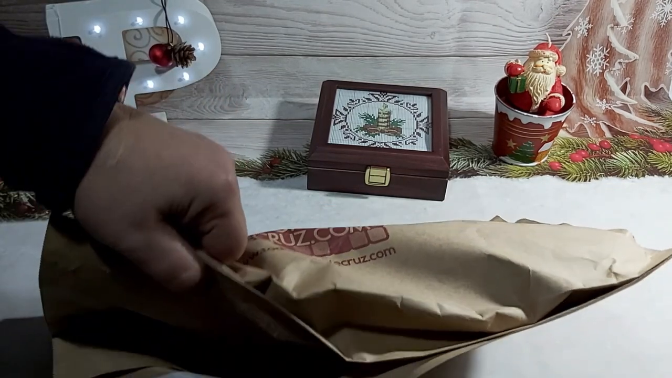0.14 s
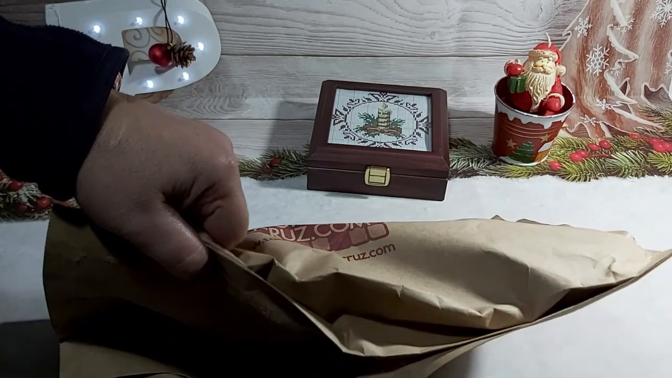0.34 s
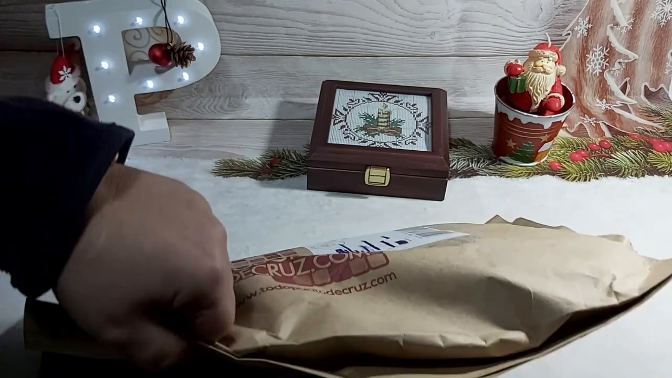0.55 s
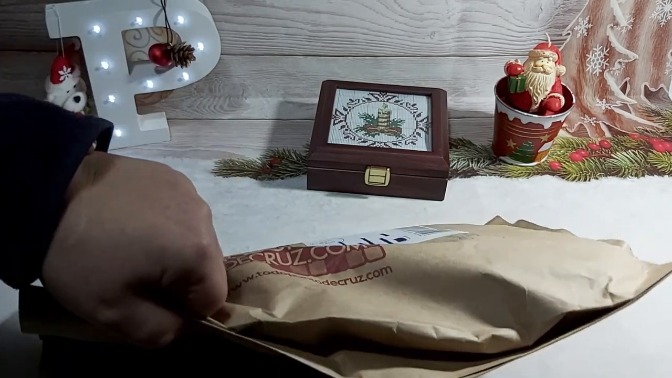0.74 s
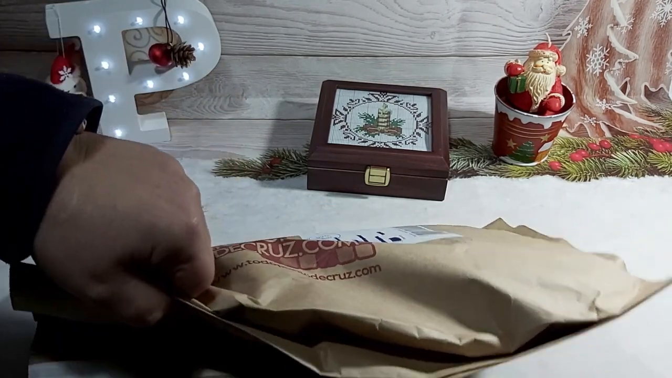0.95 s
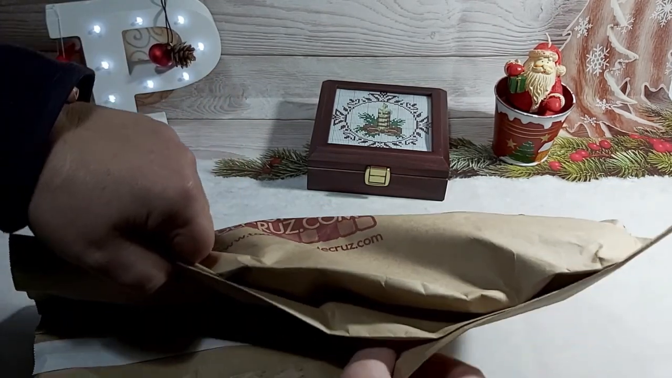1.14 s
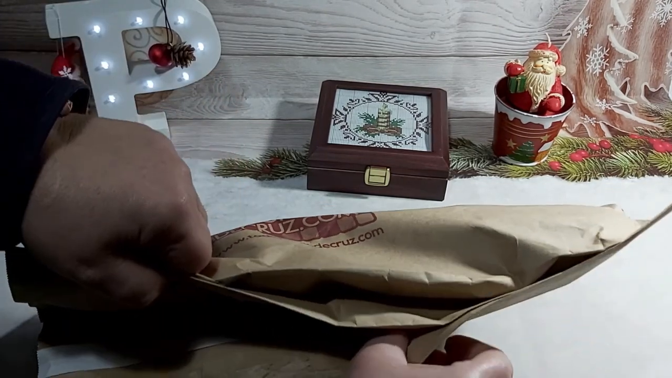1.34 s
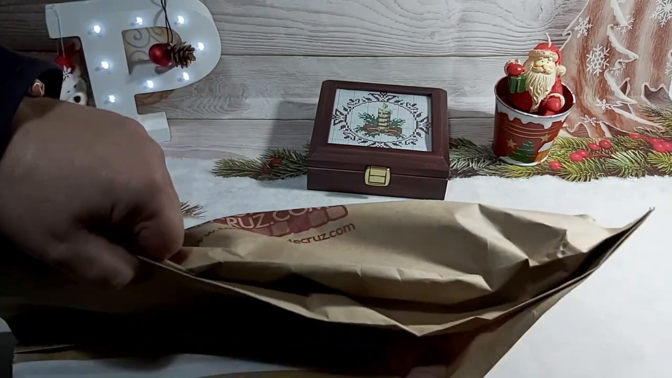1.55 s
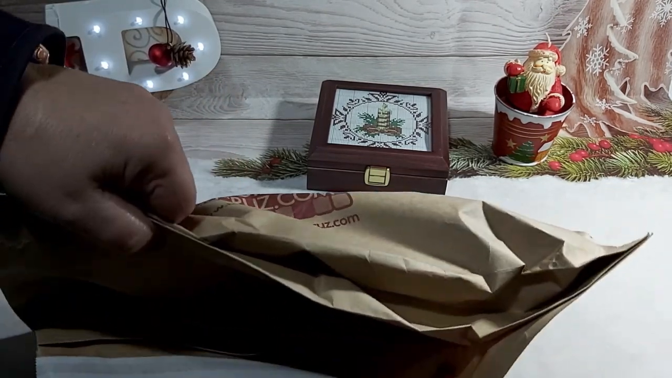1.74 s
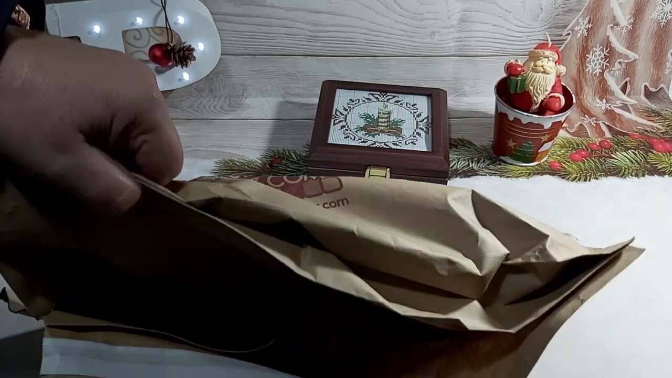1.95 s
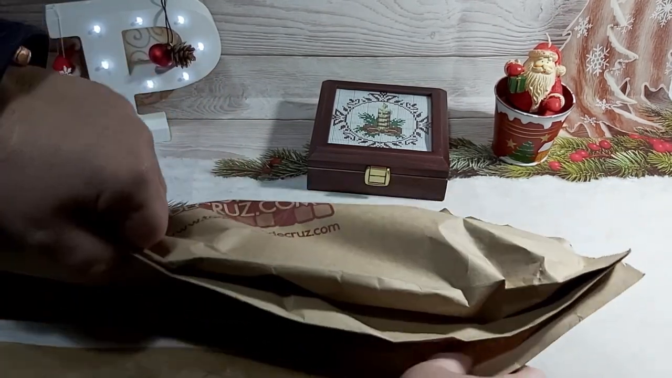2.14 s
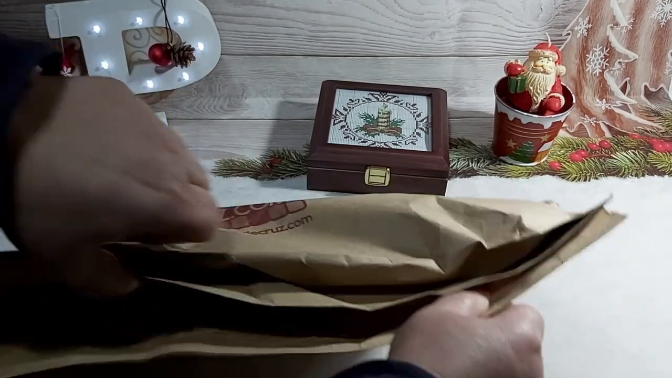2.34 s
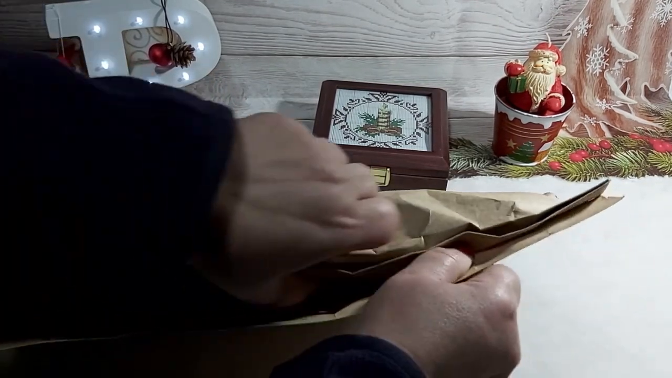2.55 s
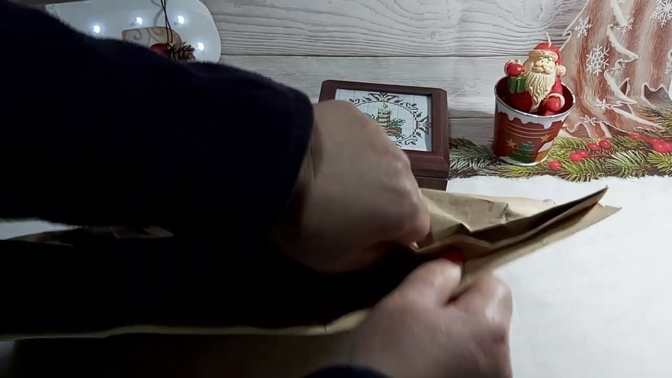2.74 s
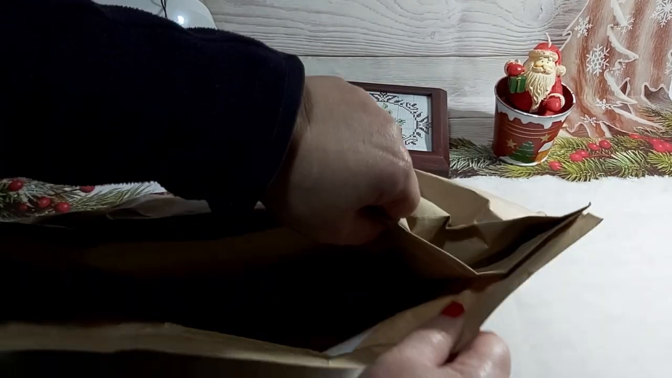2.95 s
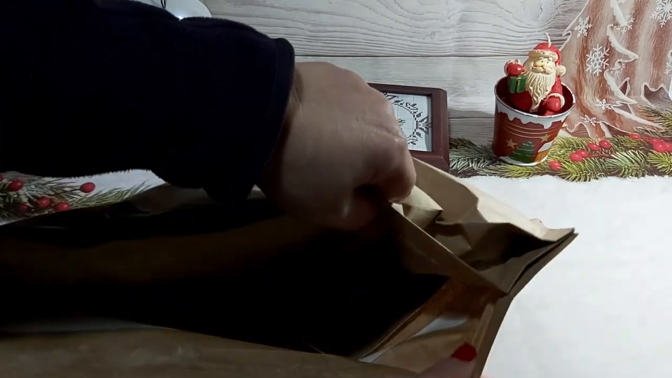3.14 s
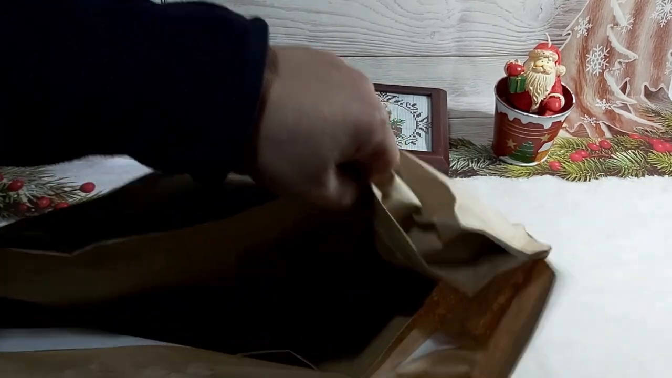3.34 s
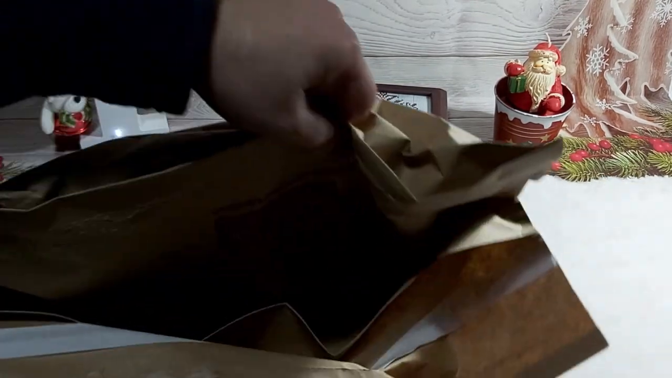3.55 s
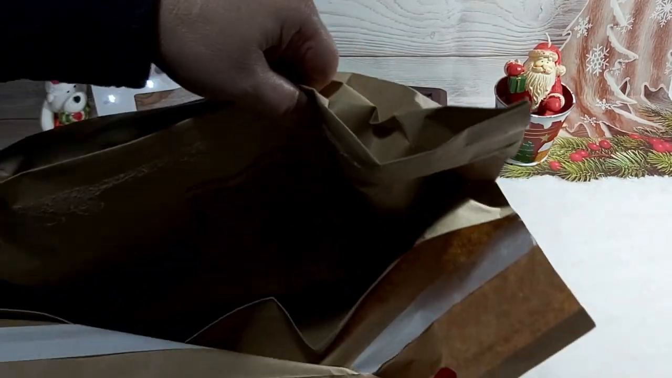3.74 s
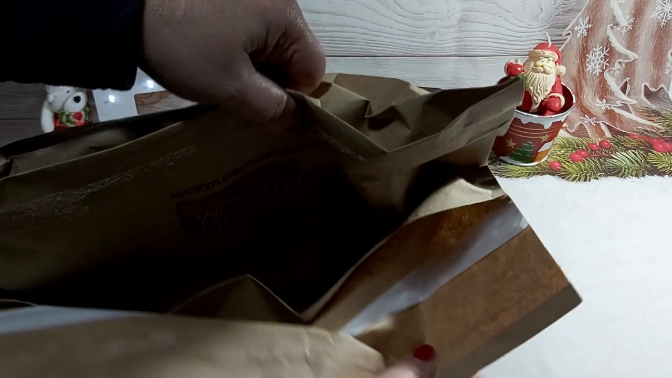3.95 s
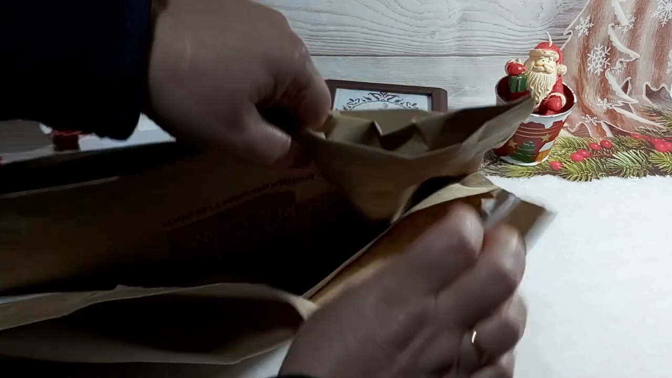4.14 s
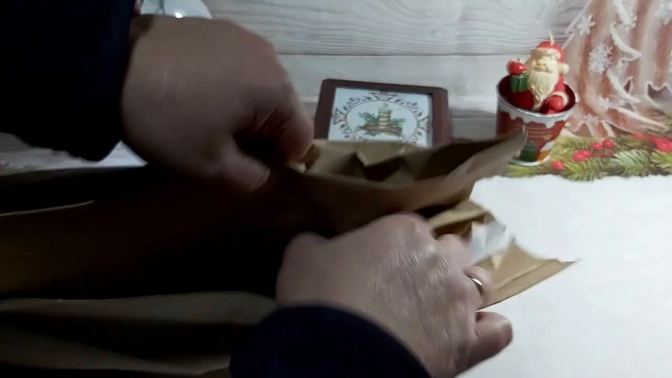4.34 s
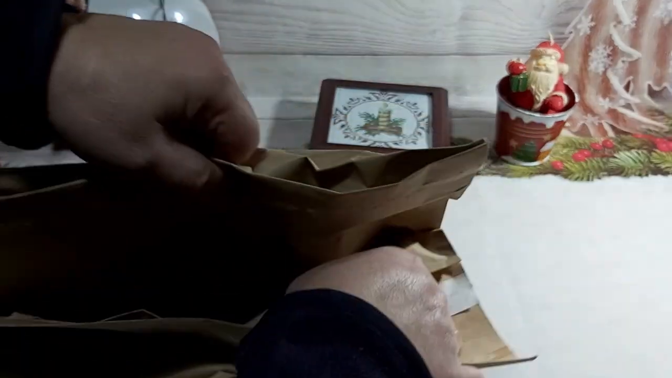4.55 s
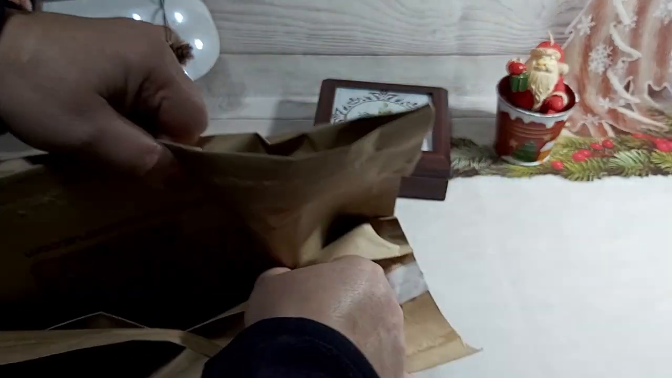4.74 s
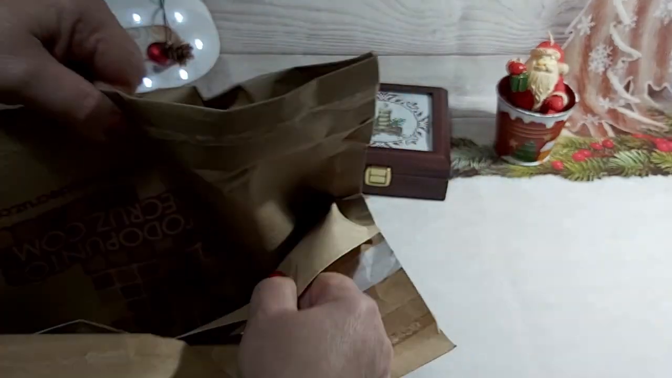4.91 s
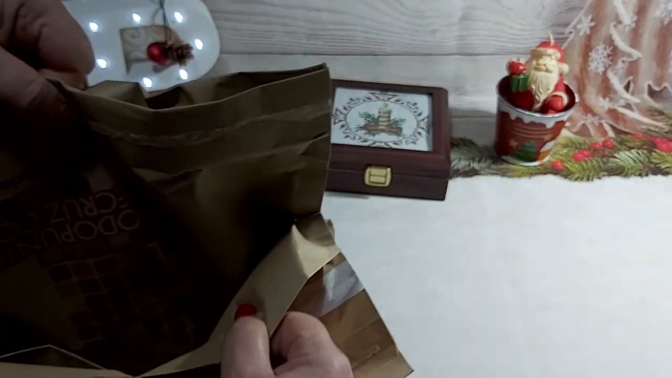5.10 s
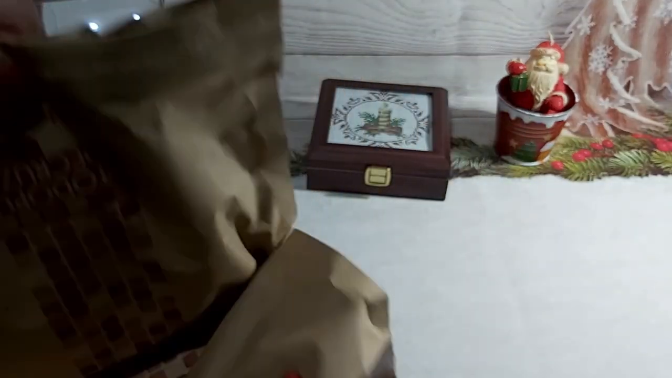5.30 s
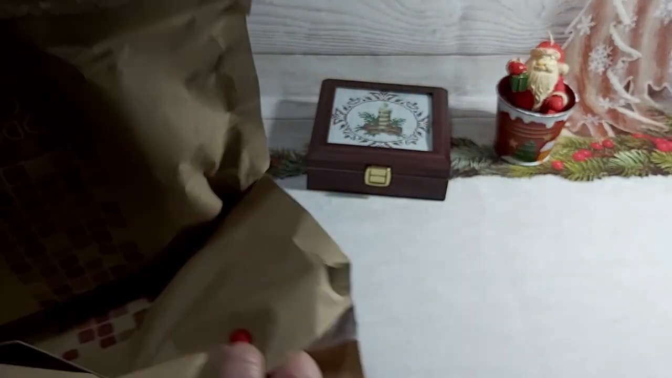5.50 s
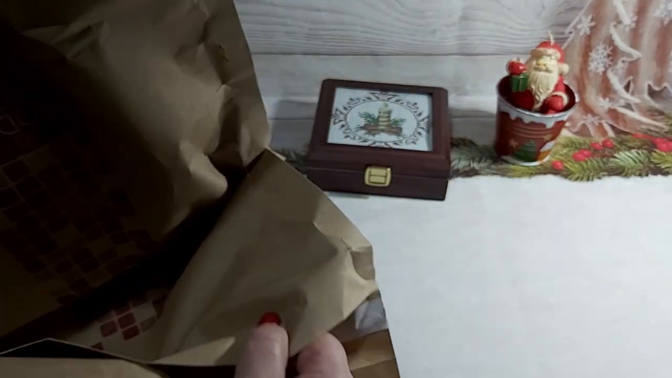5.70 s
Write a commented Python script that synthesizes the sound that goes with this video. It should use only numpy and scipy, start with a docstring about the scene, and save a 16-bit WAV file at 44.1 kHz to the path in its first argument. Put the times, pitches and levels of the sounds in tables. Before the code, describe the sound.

Two hands work open a stiff paper mailing bag on a table, very close to a stereo microphone in a small, dry room. Hollow thuds and grainy hiss start at once, ease into light rustling, then sharp creases pop in clusters. The loudest crackle comes just before three and a half seconds; a quieter spell follows, then another busy burst near the end.

```python
"""A hollow thud and a grainy hiss open the scene, then sharp snaps: two hands pull open a stiff paper
mailing bag on a table, close to the microphone in a small room.
Hiss: noise gated by random slips as the walls slide over each other. Snaps: creases buckle as short ringing
bursts. Thuds: broad panels ring at their pitch and pump the air inside.
Dragged strips sing faintly, lone fibres tick, and a quiet hush lies beneath."""
import sys
import numpy as np
from scipy import signal
from scipy.fft import rfft, irfft
from scipy.io import wavfile
from scipy.ndimage import uniform_filter1d

SR = 44100
rng = np.random.default_rng(int(sys.argv[2]) if len(sys.argv) > 2 else 0)


def digitize_waveform(pressure):
    """Quantize a signal to 16-bit integers and store it at the path in sys.argv[1].

    Rows of a 2-D input are taken as channels; values are limited to [-1, 1].
    """
    field = np.atleast_2d(pressure).T
    bounded = np.clip(field, -1, 1)
    quanta = np.round(bounded * 32767).astype(np.int16)
    wavfile.write(sys.argv[1], SR, quanta)


N = 254456
TIME_S = np.arange(N) / SR
BURST_S = np.arange(4096) / SR


def from_db(db):
    """Decibels to amplitude gain."""
    return 10 ** (np.asarray(db) / 20)


def unit_energy(x):
    """Scale each channel to a sum of squares of one."""
    return x / np.sqrt(np.sum(x ** 2, axis=-1, keepdims=True) + 1e-20)


def butter_sos(x, order, hz, kind):
    """Butterworth low- or high-pass."""
    return signal.sosfilt(signal.butter(order, hz, kind, fs=SR, output="sos"), x)


def response(spectrum, size=len(BURST_S)):
    """Causal (minimum-phase) impulse response of a spectrum, unit energy."""
    hz, db = np.transpose(spectrum)
    log_hz = np.log(np.maximum(np.fft.rfftfreq(size, 1 / SR), 10))
    octaves_outside = np.abs(log_hz - np.clip(log_hz, np.log(hz[0]), np.log(hz[-1]))) / np.log(2)
    # 20 dB per octave beyond the end points
    level_db = np.interp(log_hz, np.log(hz), db) - 20 * octaves_outside
    # folding the cepstrum makes the phase minimum
    cepstrum = irfft(np.log(from_db(level_db)))
    cepstrum[1:size // 2] *= 2
    cepstrum[size // 2 + 1:] = 0
    return unit_energy(irfft(np.exp(rfft(cepstrum))))


def through(x, impulse):
    """Filter a stereo signal, keeping its length."""
    return signal.fftconvolve(x, np.atleast_2d(impulse), axes=-1)[:, :x.shape[-1]]


def stereo_noise(length, alike):
    """White noise with left-right correlation `alike`."""
    mid, side = rng.standard_normal((2, length))
    alike = np.clip(alike, -1, 1)
    return np.sqrt((1 + alike) / 2) * mid + np.sqrt((1 - alike) / 2) * np.array([side, -side])


def add(out, start_s, sound):
    """Mix a short sound in at start_s."""
    i = int(np.clip(start_s * SR, 0, N - 1))
    out[:, i:i + sound.shape[-1]] += sound[:, :N - i]


def burst(impulse, decay_s, alike, span_s):
    """A sudden release scatters through the sheet and dies; its energy equals rms 1 over span_s."""
    scatter = stereo_noise(len(BURST_S), alike) * np.exp(-BURST_S / decay_s)
    return unit_energy(through(scatter, impulse)) * np.sqrt(span_s * SR)


def with_ring(sheet, hz, cycles, lift_db):
    """The patch that gives way lifts the sheet's sound at its own pitch and rings for a few cycles."""
    ring = signal.lfilter(*signal.iirpeak(hz, np.pi * cycles, fs=SR), sheet)
    return sheet + from_db(lift_db) * unit_energy(ring)


QUIET_DB = -62


def hush(panel, facet):
    """Background: steady noise, coloured like panel plus half facet."""
    return from_db(QUIET_DB) * through(stereo_noise(N, alike=0.53), panel + facet / 2)


ROOM_T60_S, ROOM_DB = 0.15, -6.5


def room(x, gap_s, dull_hz):
    """Table and near wall answer at once; the short tail is dull, and alike in both channels in the bass."""
    tail_s = TIME_S[:SR // 2]
    fade = from_db(-60 * tail_s / ROOM_T60_S) * (tail_s > gap_s)
    bass = butter_sos(stereo_noise(len(fade), alike=1.0), 2, 600, "low")
    treble = butter_sos(stereo_noise(len(fade), alike=0), 2, 600, "high")
    tail = unit_energy((bass + treble) * fade)
    tail = signal.lfilter(*signal.butter(1, dull_hz, fs=SR), tail)
    return from_db(ROOM_DB) * through(x, tail)


# treble gain as the mouth of the bag turns away: time_s, gain_db
BEAM_POINTS = [(1.6, 1), (3.7, -8)]


def turning(x):
    """Hiss above 10 kHz beams: strongest while the paper faces the microphone."""
    top = signal.sosfiltfilt(signal.butter(2, 10000, "high", fs=SR, output="sos"), x)
    gain = from_db(np.interp(TIME_S, *np.transpose(BEAM_POINTS)))
    return x + (gain - 1) * top


def tick(fibre):
    """Fibres let go all at once and leave a faint sizzle."""
    snap = burst(fibre, decay_s=0.0016, alike=0, span_s=0.014)
    sizzle = burst(fibre, decay_s=0.0032, alike=0, span_s=0.0019)
    return (snap + sizzle) * from_db([[1], [-1]])


# lone surface fibres letting go: start_s, level_db
FIBRE_TICKS = [(0.317, -36), (1.103, -37.5), (1.11, -41), (1.25, -42.5), (1.408, -41.5), (1.707, -37),
               (2.052, -44.5), (3.475, -37)]


def fibre_ticks(fibre):
    """Single fibres release with thin ticks."""
    out = np.zeros((2, N))
    for start_s, level_db in FIBRE_TICKS:
        add(out, start_s, from_db(level_db) * tick(fibre))
    return out


# taut strips dragged: start_s, end_s, pitch_hz, width_hz, level_db
STRIP_SCRAPES = [(0.797, 0.81, 1890, 1400, -18), (0.811, 0.868, 1792, 550, -34),
                 (0.91, 0.973, 2757, 2150, -30), (1.609, 1.803, 2100, 500, -44.5),
                 (1.822, 1.99, 960, 300, -38), (3.559, 3.927, 1898, 390, -42.5)]
OVERTONE_RATIO, OVERTONE_DB = 2.27, -13
STRIP_LOW_HZ = 500  # a narrow strip radiates no bass


def scrapes():
    """Friction feeds a strip's resonance and overtone: quick swell, slow ease, pitch sagging as it slackens."""
    out = np.zeros((2, N))
    for start_s, end_s, pitch_hz, width_hz, level_db in STRIP_SCRAPES:
        progress = np.linspace(0, 1, max(int((end_s - start_s) * SR), 2))
        swell = np.sqrt(np.abs(np.sin(np.pi * np.sqrt(progress))))
        memory = unit_energy(BURST_S * np.exp(-np.pi * width_hz * BURST_S))
        # complex noise, narrowed, then shifted up to each mode
        rubbing = stereo_noise(len(progress), alike=0.68) + 1j * stereo_noise(len(progress), alike=0.91)
        sagging_hz = pitch_hz * (1 - 0.0623 * (progress - .5))
        phase = 2 * np.pi * np.cumsum(sagging_hz) / SR
        modes = np.exp(1j * phase) + from_db(OVERTONE_DB) * np.exp(1j * OVERTONE_RATIO * phase)
        add(out, start_s, from_db(level_db) * swell * np.real(through(rubbing, memory) * modes))
    return butter_sos(out, 2, STRIP_LOW_HZ, "high")


# broad panels giving way: start_s, level_db, pitch_hz
PANEL_FLEXES = [(0.007, -20, 484), (0.071, -19.5, 500), (0.174, -26, 300), (0.246, -16.5, 477),
                (0.297, -29.5, 345), (0.451, -42, 900), (0.558, -26.5, 302), (0.634, -33, 554),
                (0.711, -40, 700), (1.469, -25, 365), (1.622, -33.5, 706), (1.76, -21, 386),
                (1.941, -20.5, 840), (2.093, -31.5, 476), (2.425, -27.5, 350), (2.481, -25.5, 354),
                (2.822, -23, 424), (2.848, -27, 404), (3.132, -23, 467), (3.424, -13.5, 319),
                (3.449, -11, 306), (3.523, -27.5, 566), (3.552, -24, 395), (3.673, -29.5, 317),
                (4.16, -33, 323), (4.35, -31.5, 364), (4.543, -32.5, 674), (4.678, -31, 500),
                (4.879, -35, 1030), (4.964, -19, 493), (5.029, -21.5, 620), (5.058, -28, 695),
                (5.149, -23, 290), (5.255, -23, 420), (5.351, -17.5, 330), (5.377, -21, 480),
                (5.428, -20, 343), (5.531, -25.5, 333), (5.625, -27, 313), (5.656, -29, 350)]
# air boom grows as the bag opens: time_s, air_db (relative to the flex)
AIR_OPENING = [(1.0, -17), (3.4, -12.5), (5.6, -12)]
# the cavity sinks in pitch from flex to flex as it grows
AIR_HZ, AIR_SAG_HZ_PER_S, AIR_RING_S = 158, 3, 0.0174


def panels(panel):
    """A flexing wall gives one push that rings at its pitch, shudders on and pumps the air in the bag."""
    out = np.zeros((2, N))
    for start_s, level_db, pitch_hz in PANEL_FLEXES:
        wall = unit_energy(butter_sos(panel, 2, 2 * pitch_hz, "low"))
        push = unit_energy(with_ring(wall, pitch_hz, cycles=1.66, lift_db=4))
        air_hz = AIR_HZ - AIR_SAG_HZ_PER_S * start_s
        air = unit_energy(np.sin(2 * np.pi * air_hz * BURST_S) * np.exp(-BURST_S / AIR_RING_S))
        air_db = np.interp(start_s, *np.transpose(AIR_OPENING))
        thud = (push + from_db(air_db) * air) * np.sqrt(0.0057 * SR)
        shudder = burst(wall, decay_s=0.0059, alike=0.76, span_s=0.0025)
        add(out, start_s, from_db(level_db) * (thud + shudder))
    return out


# creases buckling: start_s, crack_db, facet_pitch_hz, fizz_db
CREASE_SNAPS = [(0.046, -25, 4200, -32), (0.173, -20, 1690, -29.5), (0.223, -21, 1290, -42),
                (0.247, -18, 2850, -33), (0.294, -31, 2010, -51), (0.374, -32, 1150, -44),
                (0.5, -35.5, 1390, -62), (0.5374, -31.5, 2600, -28), (0.558, -30.5, 1950, -47),
                (0.758, -32.5, 1850, -41), (0.816, -27, 2090, -29), (1.292, -39, 1690, -59),
                (1.466, -22.5, 2260, -28), (1.4725, -24.5, 2480, -34), (1.534, -22, 2780, -24),
                (1.5502, -20.5, 2990, -31), (1.648, -35.5, 2330, -55), (1.7595, -17, 1970, -28),
                (1.886, -16, 1870, -32), (1.94, -21.5, 1340, -51), (2.12, -26.5, 1330, -55),
                (2.143, -28, 3500, -58), (2.279, -35.5, 1650, -56), (2.3885, -18, 2550, -29),
                (2.439, -30.5, 2610, -47), (2.536, -29, 1980, -44), (2.601, -23.5, 2210, -58),
                (2.611, -31, 2650, -55), (2.7623, -30, 1240, -56), (2.776, -24.5, 2970, -38),
                (2.824, -24.5, 2700, -24.5), (2.8486, -19, 1830, -25), (2.859, -21, 1140, -44),
                (2.873, -21.5, 2100, -28.5), (2.9094, -17, 1820, -27), (3.079, -27, 1660, -33),
                (3.158, -33, 1490, -33), (3.172, -18.5, 3940, -26), (3.253, -25, 1580, -34),
                (3.302, -17, 2800, -22.5), (3.311, -17.5, 2300, -21.5), (3.409, -24, 2690, -22.5),
                (3.422, -15.5, 2033, -26), (3.4364, -30, 2930, -27), (3.445, -13.5, 1660, -26),
                (3.525, -29.5, 1910, -55), (3.673, -26, 1850, -39), (3.772, -33, 1590, -62),
                (4.059, -20.5, 3260, -27), (4.1855, -25, 1030, -51), (4.344, -34, 1190, -50),
                (4.414, -32.5, 3430, -44), (4.629, -32, 1700, -55), (4.67, -30, 2880, -37),
                (4.93, -26, 2690, -48), (4.939, -27, 2540, -33.5), (4.9645, -21.5, 850, -33),
                (4.9741, -16.5, 2180, -38), (4.982, -20, 2710, -47), (5.03, -22.5, 1300, -39.5),
                (5.126, -27.5, 2070, -47), (5.147, -17.5, 2240, -22), (5.1736, -22, 3620, -23),
                (5.219, -20, 2840, -22.5), (5.35, -24, 1970, -24), (5.4, -16.5, 2280, -26),
                (5.408, -27, 2630, -19.5), (5.654, -29.5, 2760, -42)]
SNAP_PAN_DB = -1.9  # left minus right


def creases(facet, fibre):
    """Each crease pops with one sharp push and a millisecond of scatter, then the sheet shivers briefly."""
    out = np.zeros((2, N))
    pan = from_db([[SNAP_PAN_DB / 2], [-SNAP_PAN_DB / 2]])
    for start_s, crack_db, pitch_hz, fizz_db in CREASE_SNAPS:
        ring = unit_energy(with_ring(facet + from_db(-6) * fibre, pitch_hz, cycles=1.5, lift_db=1.5))
        scatter = burst(ring, decay_s=0.00083, alike=0.0, span_s=0.0024)
        push = unit_energy(ring * np.sqrt(0.0029 * SR) + scatter) * np.sqrt(0.0052 * SR)
        shiver = burst(facet, decay_s=0.0044, alike=0.13, span_s=0.0017)
        crack = from_db(crack_db) * (push + shiver) * pan
        add(out, start_s, crack + from_db(fizz_db) * tick(fibre))
    return out


# a held pull slackens, then dies away; the fibres stop first
SAG_DB_PER_S, RELEASE_S, FIZZ_RELEASE_S = 32, 0.017, 0.011


def stroke(start_s, hold_s, attack_s, release_s):
    """Envelope of one hand movement: swells up to start_s, sags while held, dies away."""
    since_s = TIME_S - start_s
    early_s = np.maximum(-since_s, 0)
    late_s = np.maximum(since_s - hold_s, 0)
    sag = from_db(-SAG_DB_PER_S * (np.clip(since_s, 0, hold_s) - hold_s / 2))
    return sag * np.exp(-early_s / attack_s - late_s / release_s)


# hands pull, paper drags over paper; levels before the mix trims in sliding():
# start_s, hold_s, attack_s, rumble_db, crackle_db, fizz_db
HAND_PULLS = [(0, 0.067, 0.0058, -31, -24, -22), (0.187, 0.077, 0.035, -30, -26, -28),
              (0.357, 0.025, 0.0068, -39, -37.5, -37), (0.533, 0.045, 0.0055, -34.5, -34, -39),
              (0.803, 0.054, 0.0085, -35, -26, -25.5), (0.912, 0.054, 0.064, -45.5, -31.5, -31),
              (1.155, 0.072, 0.054, -43.5, -37.5, -36.5), (1.303, 0.03, 0.006, -42, -46, -44),
              (1.475, 0.0893, 0.0084, -26, -22, -23), (1.761, 0.018, 0.058, -34, -30, -40),
              (1.864, 0.096, 0.039, -32.5, -27.5, -27), (2.183, 0.0069, 0.035, -35.5, -27.5, -37),
              (2.445, 0.1374, 0.035, -36.5, -35.5, -44.5), (2.597, 0.028, 0.0072, -34.5, -33.5, -39),
              (2.841, 0.043, 0.035, -30, -32, -48), (2.923, 0.028, 0.0059, -42, -29, -29),
              (3.06, 0.14, 0.022, -33, -27, -32.5), (3.264, 0.053, 0.0078, -28, -28.5, -28),
              (3.415, 0.0457, 0.034, -27, -23, -26.5), (3.524, 0.098, 0.02, -35, -36, -51),
              (3.684, 0.13, 0.034, -43, -47, -56), (4.05, 0.054, 0.0087, -31, -33, -38),
              (4.174, 0.023, 0.012, -27, -24.5, -35.5), (4.339, 0.021, 0.0041, -34.5, -42, -55),
              (4.667, 0.02, 0.033, -39, -42, -39.5), (4.797, 0.055, 0.021, -38, -30.5, -35.5),
              (4.931, 0.12, 0.032, -31.5, -32, -44), (5.147, 0.038, 0.0099, -34, -30.5, -42),
              (5.239, 0.02, 0.015, -28, -29.5, -33), (5.349, 0.081, 0.0015, -24.5, -22, -25),
              (5.466, 0.08, 0.0265, -36, -33, -41.5), (5.598, 0.05, 0.056, -38.5, -41.5, -49.5)]
# one wall glides lightly over the other: start_s, hold_s, fizz_db (before the mix trims)
WALL_GLIDES = [(0.11, 0.084, -31), (0.769, 0.2, -38.5), (1.735, 0.13, -30.5), (2.984, 0.14, -31),
               (3.31, 0.096, -27.5)]
GLIDE_ATTACK_S, GLIDE_CRACKLE_DB = 0.0095, -8.5  # crackle relative to fizz
# hands rest, grazing fades: middle_s, half_length_s, depth_db
HAND_RESTS = [(0.444, 0.034, -18.5), (0.714, 0.03, -5), (0.996, 0.033, -8), (1.256, 0.024, -11),
              (2.02, 0.018, -27), (2.324, 0.026, -16), (3.944, 0.12, -9.5), (4.288, 0.053, -8),
              (5.32, 0.057, -6.5), (5.734, 0.18, -25)]
# fingers graze the paper throughout: rumble, crackle, fizz (before the mix trims)
GRAZE_DB = (-46, -42.5, -45.5)


def friction():
    """Strength of rumble, crackle and fizz: light grazing, pulls and glides add up in power."""
    resting_db = np.zeros(N)
    for middle_s, half_length_s, depth_db in HAND_RESTS:
        resting_db += depth_db * np.exp(-((TIME_S - middle_s) / half_length_s) ** 2)
    rumble, crackle, fizz = [from_db(db + resting_db) ** 2 for db in GRAZE_DB]
    for start_s, hold_s, attack_s, rumble_db, crackle_db, fizz_db in HAND_PULLS:
        pull = stroke(start_s, hold_s, attack_s, RELEASE_S)
        rumble += (from_db(rumble_db) * pull) ** 2
        crackle += (from_db(crackle_db) * pull) ** 2
        fizz += (from_db(fizz_db) * stroke(start_s, hold_s, attack_s, FIZZ_RELEASE_S)) ** 2
    for start_s, hold_s, fizz_db in WALL_GLIDES:
        glide = from_db(fizz_db) * stroke(start_s, hold_s, GLIDE_ATTACK_S, FIZZ_RELEASE_S)
        crackle += (from_db(GLIDE_CRACKLE_DB) * glide) ** 2
        fizz += glide ** 2
    return np.sqrt([rumble, crackle, fizz])


def random_events(per_s, spread_db):
    """Random hits (0 between them) and a capped, uneven size for every sample."""
    sizes = from_db(spread_db * np.minimum(rng.exponential(1, N), np.pi))
    return rng.random(N) < per_s / SR, sizes


def stick_slip(per_s, spread_db, decay_s, smooth):
    """Loudness of tiny slips of uneven size over a smooth slide; mean power about 1."""
    hits, sizes = random_events(per_s, spread_db)
    power = signal.lfilter([1], [1, -np.exp(-2 / (decay_s * SR))], hits * sizes ** 2 + 1e-18)
    power /= uniform_filter1d(power, size=3000) + power.mean() / 10
    return np.sqrt(smooth + (1 - smooth) * power)


def crinkles(per_s, spread_db, low_hz, high_hz, cycles):
    """Small wrinkles pop at random, each in a facet of its own size and place; rms about 1."""
    hits, sizes = random_events(per_s, spread_db)
    pops = hits * sizes
    pitches_hz = np.geomspace(low_hz, high_hz, 20)
    dealt = rng.integers(0, len(pitches_hz), N)
    out = np.zeros((2, N))
    for k, hz in enumerate(pitches_hz):
        facet_pops = pops * (dealt == k) + 1e-18
        ring = signal.lfilter(*signal.iirpeak(hz, np.pi * cycles, fs=SR), facet_pops) / np.sqrt(hz)
        out += ring * (.5 + rng.random((2, 1)))
    power = np.mean(out ** 2, axis=0)
    return out / np.sqrt(uniform_filter1d(power, size=6000) + power.mean() / 10)


def sliding(panel, facet, fibre):
    """Fine slips shake fibres and facets, wrinkles pop among them, slower jerks stir the heavy panels."""
    rumble, crackle, fizz = friction()
    slips = stick_slip(per_s=540, spread_db=8.5, decay_s=0.0021, smooth=0.54)
    jerks = stick_slip(per_s=90, spread_db=1.0, decay_s=0.014, smooth=0.18)
    panel_drag = through(stereo_noise(N, alike=0.82) * jerks * rumble, panel)
    big_wrinkles = rumble * crinkles(per_s=55, spread_db=5.0, low_hz=343, high_hz=1300, cycles=2.4)
    facet_drag = through(stereo_noise(N, alike=0.34) * slips * jerks * crackle, facet)
    small_wrinkles = crackle * crinkles(per_s=260, spread_db=1.5, low_hz=844, high_hz=5400, cycles=3.2)
    fibre_hiss = through(stereo_noise(N, alike=0) * slips * fizz, fibre) * from_db([[1.4], [-1.4]])
    return (from_db(0.4) * panel_drag + from_db(-5.0) * big_wrinkles
            + from_db(-3.5) * facet_drag + from_db(-6.0) * small_wrinkles
            + from_db(-2.0) * fibre_hiss)


# radiation of whole panels, palm-sized facets, surface fibres: freq_hz, density_db (dB per Hz, relative)
PANEL_SPECTRUM = [(30, -38), (75, -11.5), (130, -13.5), (195, -9.5), (270, 1), (450, -1.5), (750, -5),
                  (1200, -14.5)]
FACET_SPECTRUM = [(350, -25), (850, 2), (1350, -0.5), (2000, 1.5), (3400, -1.5), (4400, -2.5),
                  (6500, -34.5)]
FIBRE_SPECTRUM = [(2800, -4), (5200, 2), (7000, 3), (9000, 0), (12000, 2), (16000, -4.5)]


def scene():
    """The bag, its room and a faint background."""
    panel, facet, fibre = response(PANEL_SPECTRUM), response(FACET_SPECTRUM), response(FIBRE_SPECTRUM)
    events = fibre_ticks(fibre) + scrapes() + panels(panel) + creases(facet, fibre)
    bag = turning(events + sliding(panel, facet, fibre))
    return bag + room(bag, gap_s=0.00055, dull_hz=6700) + hush(panel, facet)


PORT_LAG_S = .00007  # the bag lies a little nearer the left microphone port
CUTOFF_HZ = 15900


def record(dry):
    """Sound reaches the right port a moment later; the sharpest peaks overload; the top is cut."""
    lag = round(PORT_LAG_S * SR)
    ports = np.array([dry[0], np.pad(dry[1], (lag, 0))[:N]])
    overloaded = np.clip(ports, -.82, .82)
    return signal.sosfilt(signal.ellip(10, .1, 80, CUTOFF_HZ, fs=SR, output="sos"), overloaded)


dry = scene()
out = record(dry)
digitize_waveform(out)
```